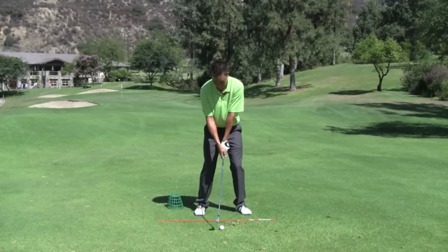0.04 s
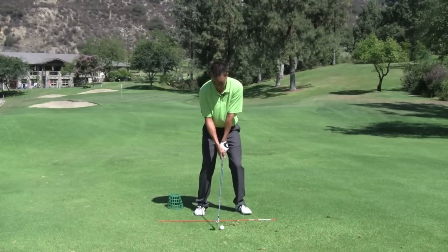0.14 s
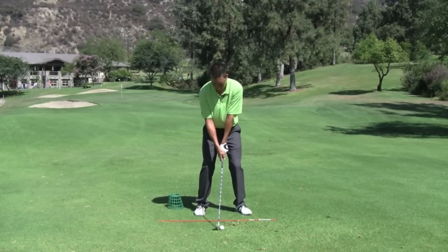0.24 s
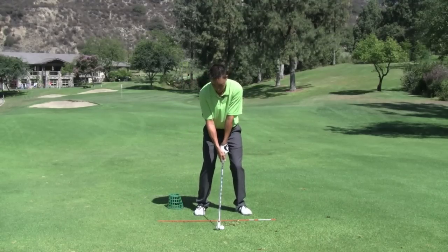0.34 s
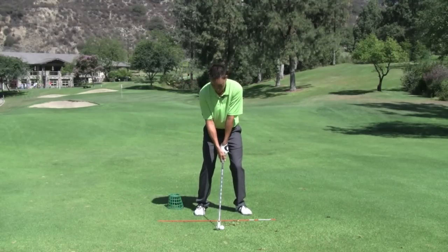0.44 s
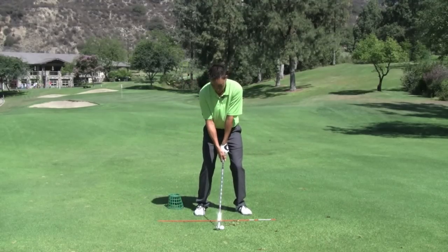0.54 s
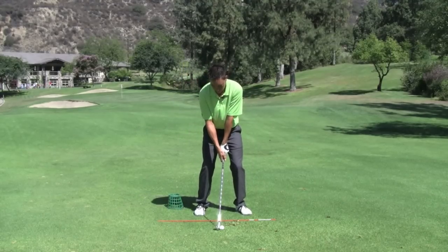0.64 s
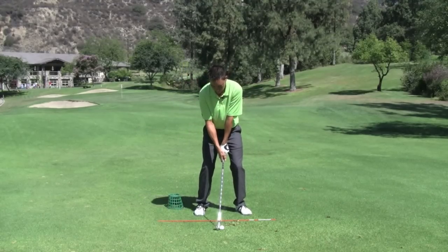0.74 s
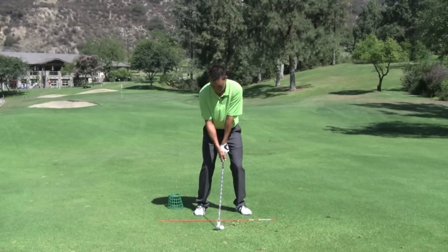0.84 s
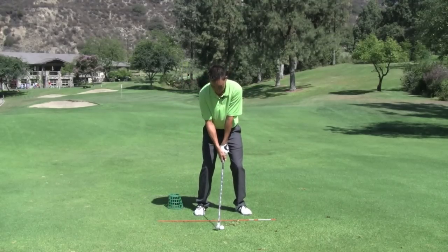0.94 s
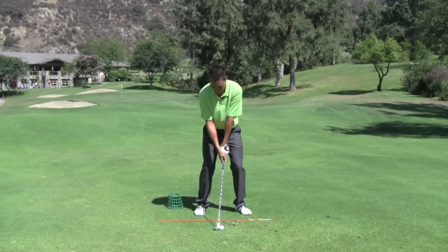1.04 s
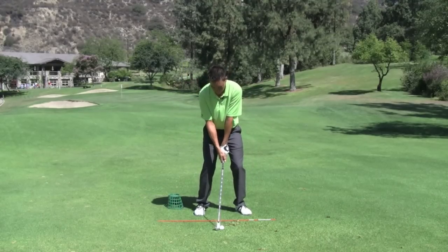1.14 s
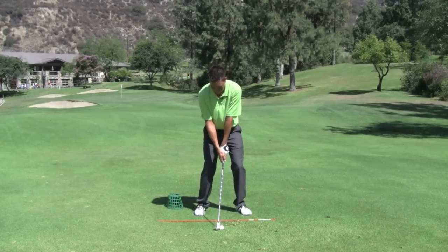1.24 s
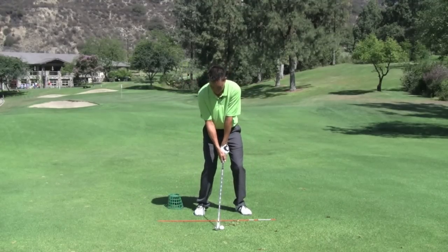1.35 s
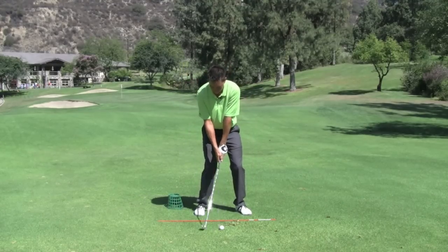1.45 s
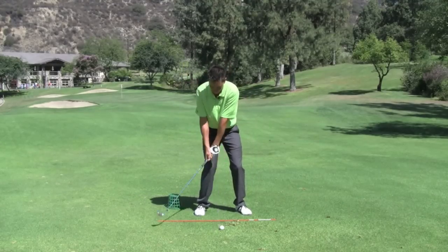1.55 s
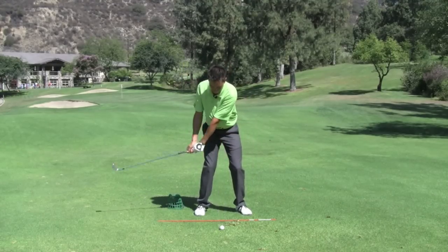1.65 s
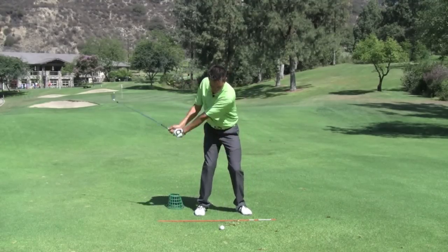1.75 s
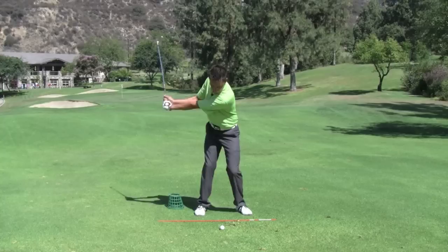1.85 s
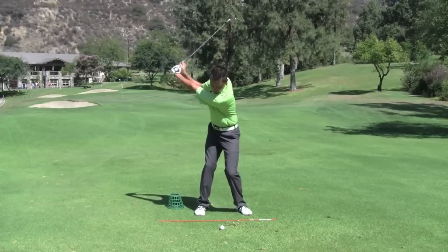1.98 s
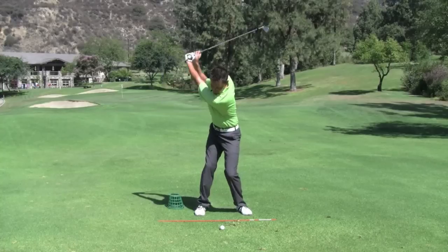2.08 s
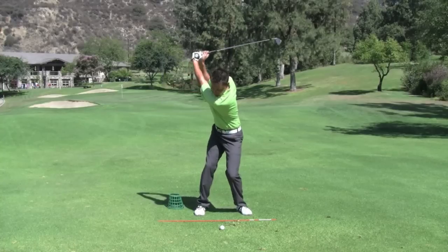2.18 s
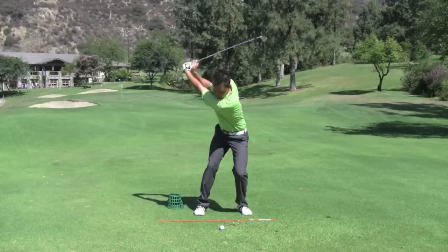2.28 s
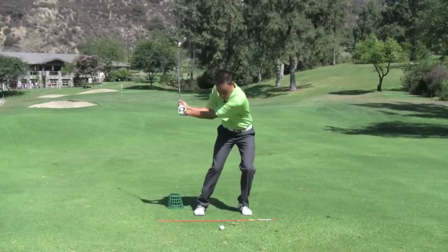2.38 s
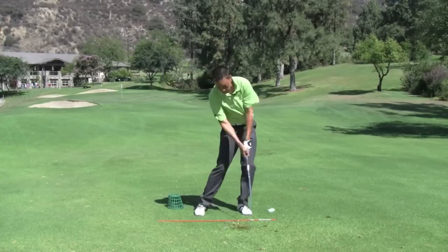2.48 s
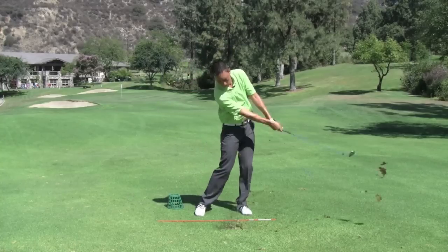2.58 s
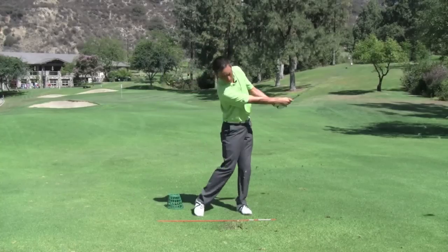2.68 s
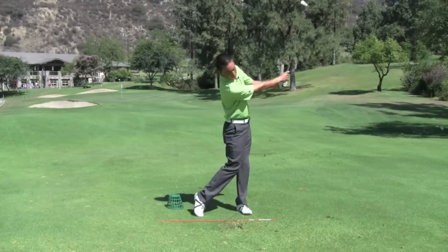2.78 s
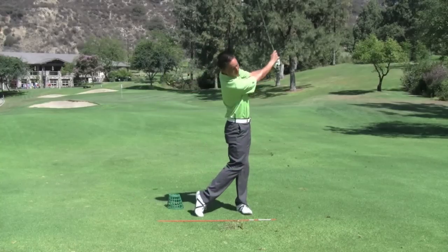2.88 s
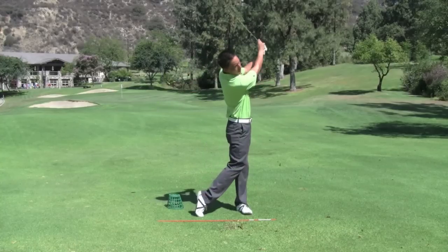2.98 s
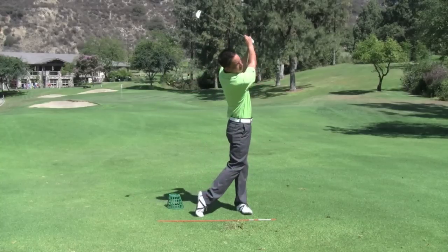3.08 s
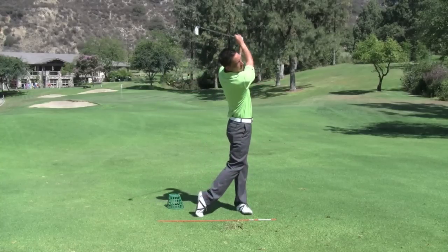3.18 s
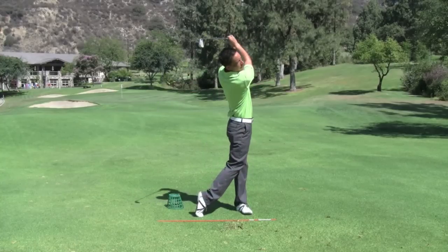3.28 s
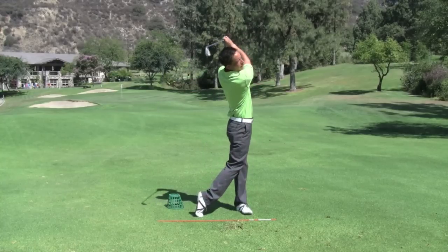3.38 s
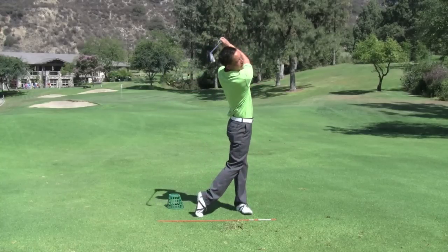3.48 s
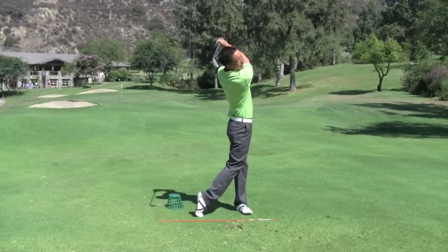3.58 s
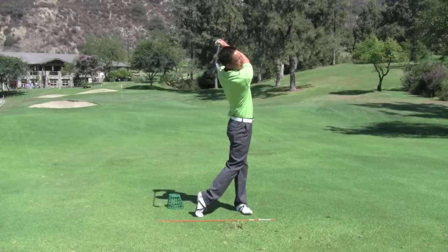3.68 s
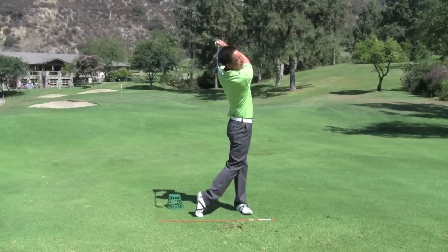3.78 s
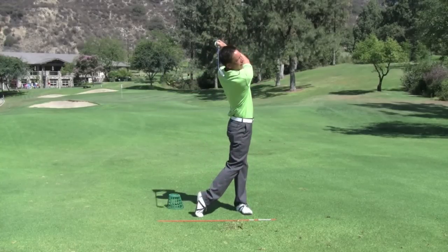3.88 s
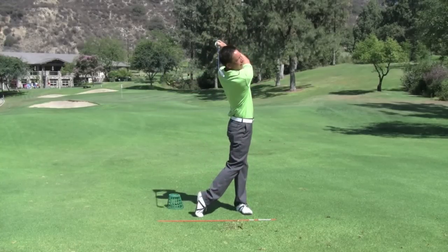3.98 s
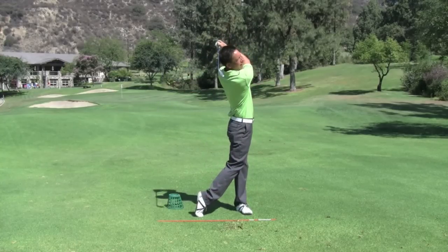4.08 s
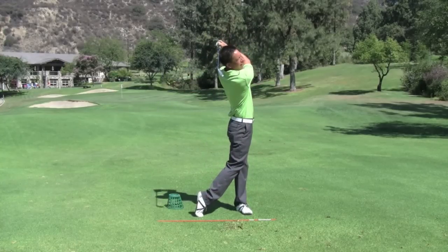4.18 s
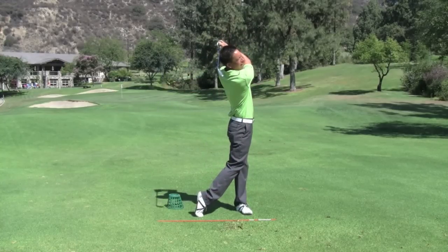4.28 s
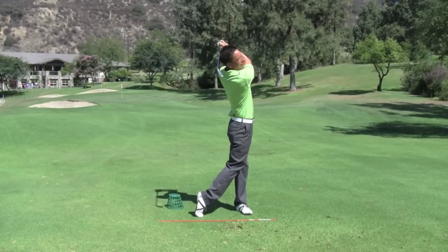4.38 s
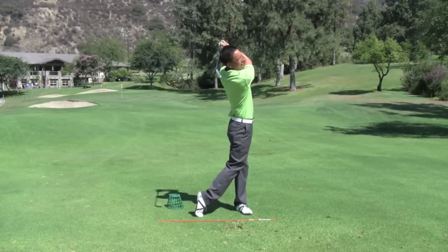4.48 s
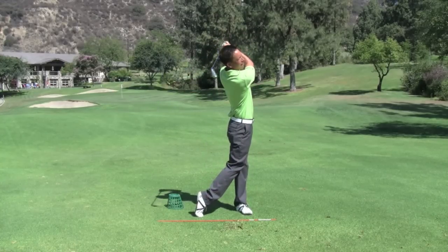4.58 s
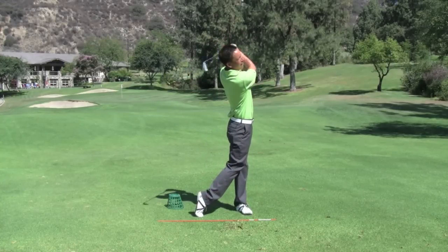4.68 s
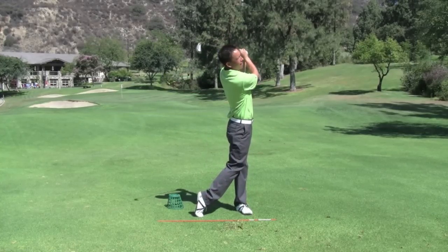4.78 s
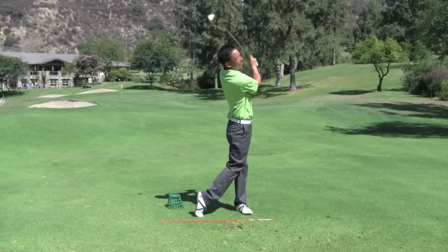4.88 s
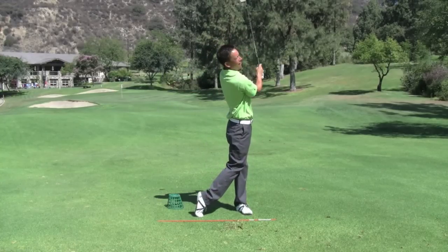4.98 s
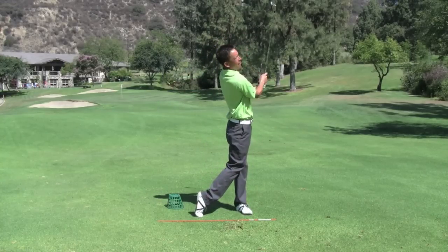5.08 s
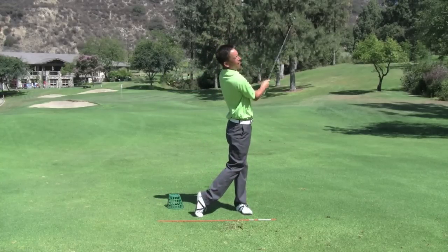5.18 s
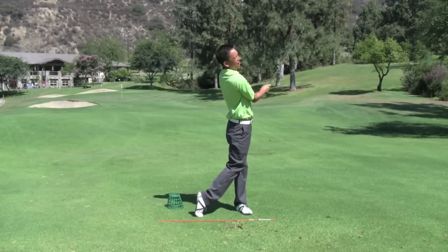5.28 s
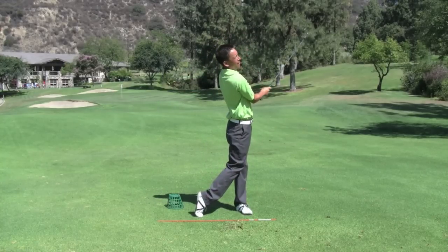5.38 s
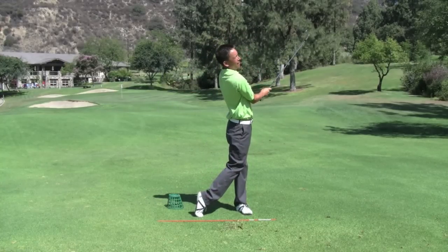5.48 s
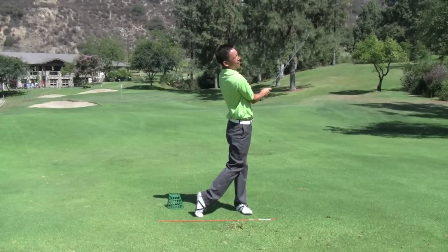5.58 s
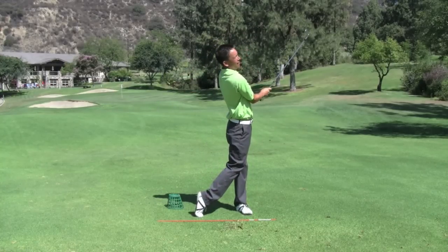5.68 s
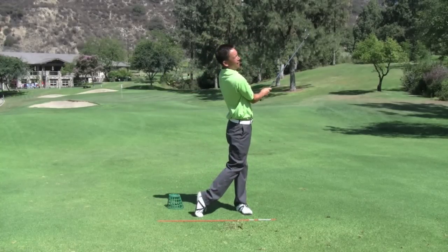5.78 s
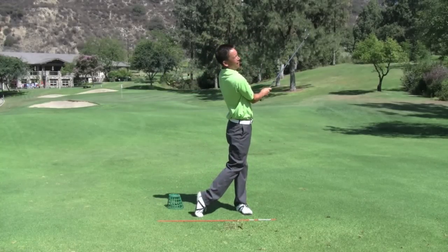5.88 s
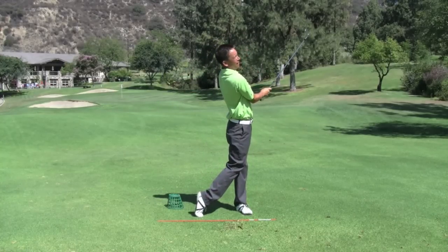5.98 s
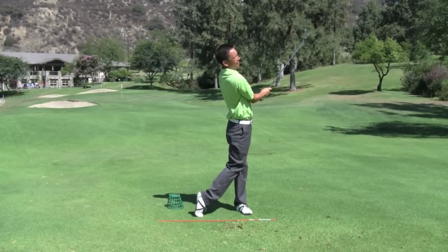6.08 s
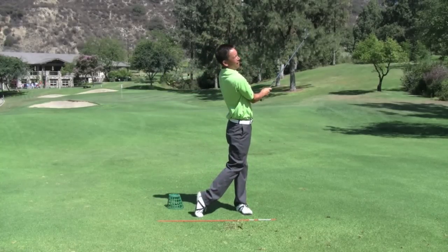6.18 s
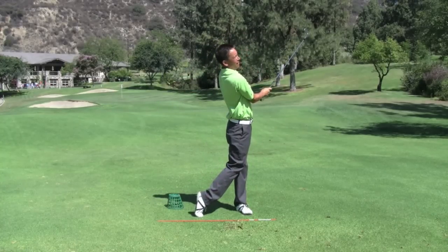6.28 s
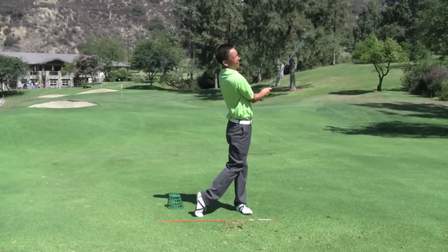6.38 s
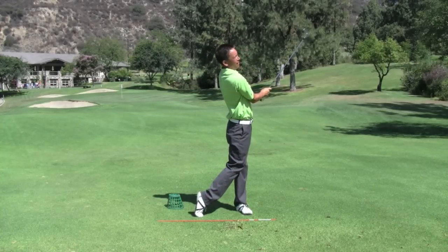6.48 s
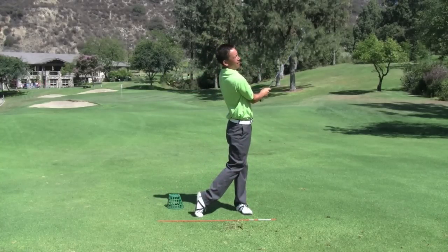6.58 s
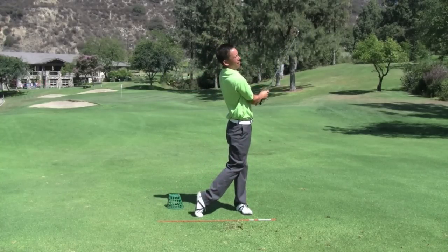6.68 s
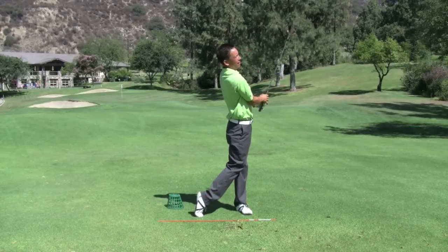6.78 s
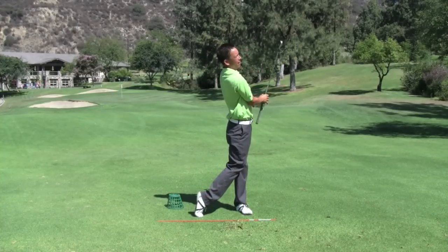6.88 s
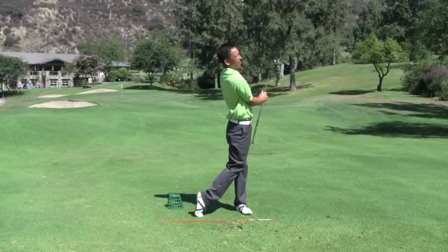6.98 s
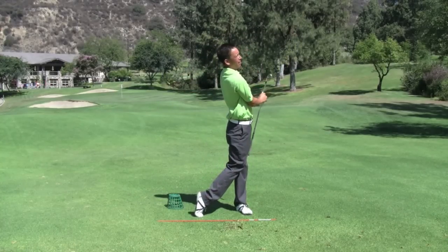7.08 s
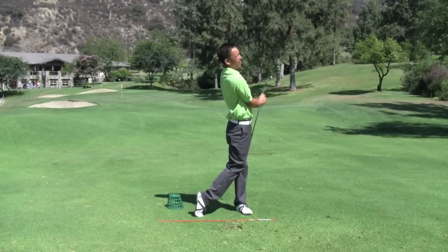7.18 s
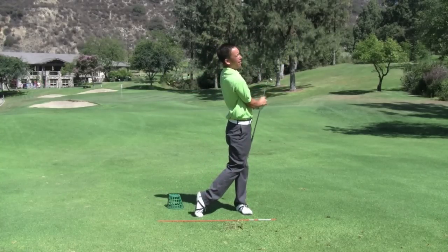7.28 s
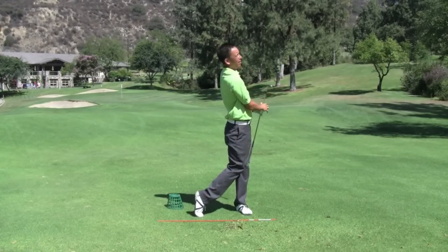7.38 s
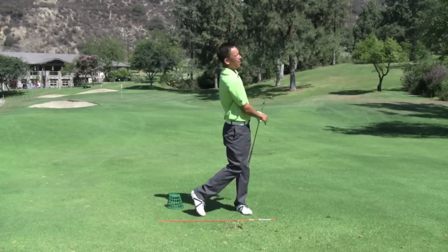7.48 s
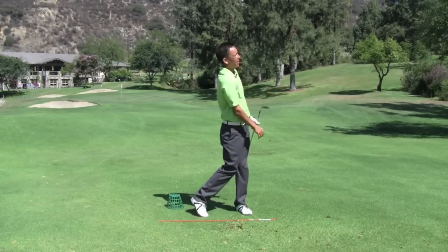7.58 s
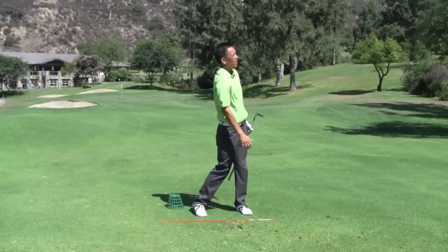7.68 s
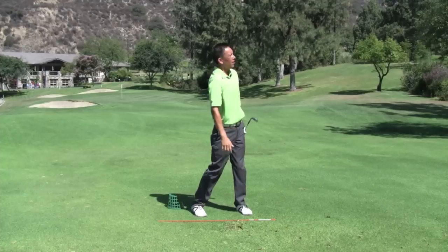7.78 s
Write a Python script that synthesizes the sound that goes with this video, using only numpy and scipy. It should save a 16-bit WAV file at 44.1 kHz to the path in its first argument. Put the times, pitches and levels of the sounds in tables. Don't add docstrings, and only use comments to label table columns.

```python
import sys
import numpy as np
from scipy import signal
from scipy.io import wavfile

SR = 44100
rng = np.random.default_rng(int(sys.argv[2]) if len(sys.argv) > 2 else 0)


def decibels_to_gain(level_db):
    exponent = np.asarray(level_db, float) / 20
    return 10 ** exponent


def materialize(psi):
    bounded = np.clip(np.atleast_2d(psi).T, -1, 1)
    quanta = np.round(bounded * 32767).astype(np.int16)
    wavfile.write(sys.argv[1], SR, quanta)


N = 346185
TIME = np.arange(N) / SR
SIDES = np.array([[1], [-1]])
BALL_S = 2.60232


def rms_one(x):
    return x / np.sqrt(np.mean(x ** 2) + 1e-20)


def in_time(rows):
    s, *columns = np.transpose(rows)
    return [np.interp(TIME, s, column) for column in columns]


def at_hz(points, hz):
    f_hz, value = np.array(points)[:, 0], np.array(points)[:, 1]
    return np.interp(np.log(hz), np.log(f_hz), value)


def band(x, low_hz, high_hz):
    edges_hz = [low_hz, min(high_hz, 0.45 * SR)]
    return signal.sosfilt(signal.butter(2, edges_hz, "band", fs=SR, output="sos"), x)


def two_ports(mid, side, alike):
    alike = np.clip(alike, -1, 1)
    return np.sqrt(1 + alike) * mid + np.sqrt(1 - alike) * side * SIDES


def hiss(low_hz, high_hz, alike, count=N):
    mid, side = band(rng.standard_normal((2, count)), low_hz, high_hz)
    return rms_one(two_ports(mid, side, alike))


def drift(rate_hz):
    r = np.exp(-80 * np.pi * rate_hz / SR)
    slow = signal.lfilter([1], [1, -2 * r, r * r], rng.standard_normal(N // 40 + 2002))[2000:]
    return np.interp(np.arange(N) / 40, np.arange(len(slow)), rms_one(slow))


def add(out, s, x, pan_db=0):
    at = round(s * SR)
    panned = x * decibels_to_gain(SIDES * pan_db / 2)
    out[:, at:at + x.shape[-1]] += panned[:, :N - at]


def rung(modes):
    t = TIME[:SR // 4]
    return sum(decibels_to_gain(db - 60 * t / t60) * np.sin(2 * np.pi * hz * t) for hz, db, t60 in modes)


def dying(low_hz, high_hz, t60, alike):
    settled = hiss(low_hz, high_hz, alike, count=SR)[:, SR // 2:]
    return settled * decibels_to_gain(-60 * TIME[:SR // 2] / t60)


def swell(peak_s, rise_db_per_s, fall_db_per_s):
    before, after = np.maximum(peak_s - TIME, 0), np.maximum(TIME - peak_s, 0)
    return decibels_to_gain(-rise_db_per_s * before - fall_db_per_s * after)


def bell(middle_s, half_s):
    return np.exp(-((TIME - middle_s) / half_s) ** 2)


def air():
    # t/s, level/dB
    air_level = [(0.0, -50.5), (1.94, -51.5), (2.8, -49.5), (3.61, -51), (5.55, -51), (6.34, -53.5),
                 (6.84, -52), (7.85, -52.5)]
    # f/Hz, density/dB per Hz
    air_colour = [(24, -59.5), (40, -27), (85, -7), (109, 1.5), (140, -5.5), (185, 1.5), (204, -5.5),
                  (542, -5), (646, -7), (697, -7.5), (1020, -13), (1810, -18.5), (2840, -24.5), (4460, -29),
                  (16000, -38.5)]
    # f/Hz, correlation/1
    likeness = [(60, 0.93), (130, 1), (290, 0.22), (640, 0.34), (1410, 0.31), (3100, 0.32), (6820, 0.07),
                (15000, 0.091)]
    out, together = 0, drift(1.5)
    edges = 35 * 2 ** np.arange(0, 9.1, 1 / 3)
    white = rng.standard_normal((2, 2, N))
    for k, (low, high) in enumerate(zip(edges, edges[1:])):
        mid, side = band(white[k % 2], low, high)
        hz = np.sqrt(low * high)
        gain = decibels_to_gain(at_hz(air_colour, min(hz, 14000)) + 0.6 * (together + drift(9)))
        out = out + gain * two_ports(mid, side, at_hz(likeness, hz))
    out = out / np.std(band(out, 400, 2000))
    top = signal.ellip(10, 0.5, 50, 15750, fs=SR, output="sos")
    return signal.sosfilt(top, out * decibels_to_gain(in_time(air_level)[0] + 2))


def machine():
    # f/Hz, width/Hz, rms level/dB
    resonances = [(519.5, 30, -64.5), (718.4, 60, -61), (793.7, 23, -64)]
    # t/s, length/s, level/dB
    whine_pulses = [(1.46, .07, -57), (2.416, .08, -65), (3.5, 0.11, -59), (3.654, .07, -71),
                    (3.86, 0.088, -62), (4.755, 0.24, -66), (5.3, 0.087, -68), (6.02, .12, -63),
                    (6.91, .09, -63), (7.098, 0.086, -54.5), (7.219, .11, -66), (7.653, 0.22, -62)]
    whine_hz, ramp_s = 1773, 0.023
    out = 0
    for hz, width, db in resonances:
        out = out + decibels_to_gain(db + 2.5 * drift(3)) * hiss(hz - width / 2, hz + width / 2, 0.5)
    whine = decibels_to_gain(-70.5 + 4 * drift(3.5))
    for s, length, db in whine_pulses:
        whine += decibels_to_gain(db - 3) * np.clip(np.minimum(TIME - s, s + length - TIME) / ramp_s, 0, 1)
    return out + whine * np.sin(2 * np.pi * np.cumsum(whine_hz + 4 * drift(5)) / SR)


def breeze():
    # t/s, level/dB
    rumble_level = [(0.0, -31.5), (0.11, -41.5), (1.16, -44), (1.51, -48), (2.08, -42), (2.4, -45),
                    (2.69, -32.5), (2.82, -44.5), (3.32, -49.5), (4.9, -49), (5.31, -53), (5.64, -61.5),
                    (6.8, -70), (7.52, -60), (7.7, -48.5), (7.85, -61)]
    # t/s, peak level/dB, f/Hz, length/s
    buffets = [(0.009, -27, 161, 0.029), (0.079, -37, 134, 0.041), (0.249, -25.5, 124, 0.049),
               (0.287, -23, 128, 0.052), (0.319, -24.5, 143, 0.05), (0.359, -24.5, 178, 0.026),
               (0.439, -25.5, 135, 0.037), (0.55, -38, 181, 0.035), (0.638, -32, 173, 0.039),
               (1.226, -31.5, 80.7, 0.033), (1.722, -31, 148, 0.028), (1.853, -32.5, 137, 0.046),
               (1.915, -31.5, 144, 0.031), (2.126, -32.5, 127, 0.069), (2.195, -25, 139, 0.044),
               (2.503, -29, 151, 0.027), (2.549, -21.5, 177, 0.052), (2.579, -22, 150.6, 0.047),
               (2.645, -25, 218, 0.042), (2.743, -23, 109, 0.037), (2.789, -29, 141, 0.049),
               (3.007, -29.5, 120, 0.033), (3.068, -33, 108, 0.042), (4.048, -33.5, 145, 0.034),
               (4.202, -41, 153, 0.034), (5.509, -38.5, 287, 0.04)]
    apart_db, apart_spread_db = 1.5, 3.5
    low = hiss(70, 170, 0.6) * decibels_to_gain(3 * drift(14))
    upper = hiss(140, 300, -0.6) * decibels_to_gain(-3 + 4 * drift(14))
    out = decibels_to_gain(in_time(rumble_level)[0] - 3) * (low + upper)
    gusty = hiss(140, 332, 0.084)
    for (s, db, hz, length), turn in zip(buffets, rng.random((len(buffets), 3))):
        t = TIME[:int(2.5 * length * SR)]
        pulse = t / (0.26 * length) * np.exp(1 - t / (0.28 * length))
        shape = decibels_to_gain(db - 4.5) * pulse ** 1.78
        mid = decibels_to_gain(-1) * np.sin(2 * np.pi * (hz * t + turn[0]))
        apart = decibels_to_gain(apart_db + apart_spread_db * (2 * turn[2] - 1))
        side = apart * np.sin(2 * np.pi * (max(1.3 * hz, 175) * t + turn[1]))
        rough = decibels_to_gain(-6.5) * gusty[:, round(s * SR):][:, :len(t)]
        add(out, s, shape * (mid + side * SIDES + rough))
    return out


def birds():
    # top t/s, top f/Hz, level/dB, rise/s, fall/s
    arches = [
        (0.829, 4830, -60, .012, .036),
        (3.22, 4340, -57.5, .021, 0.06),
        (4.961, 4360, -53.5, 0.041, 0.027),
    ]
    # top t/s, top f/Hz, level/dB, rise/s, fall/s
    steep_arches = [
        (1.456, 4100, -65, .032, .034),
        (6.708, 4236, -58, .017, .03),
        (7.262, 4120, -57.5, .019, .036),
    ]
    # start t/s, length/s, from f/Hz, to f/Hz,
    # level/dB
    peeps = [(0.41, .025, 4530, 5600, -69), (0.86, 0.11, 3900, 3900, -61.5), (0.96, .1, 3890, 3600, -72),
             (3.25, .026, 6400, 5700, -60), (4.983, 0.026, 3620, 3460, -59), (4.98, .1, 4230, 4300, -73),
             (5.724, .03, 5870, 6000, -62), (6.615, 0.043, 1190, 927, -55.5),
             (6.73, 0.028, 6420, 6380, -63), (6.735, .022, 3180, 3180, -60),
             (6.745, 0.065, 3890, 3900, -70), (6.83, .025, 683, 672, -49), (7.215, 0.035, 3300, 3100, -61)]
    crest_s, fade_db_per_s = 0.007, 70
    notes = []
    for rows, sweep_hz_per_s in [(arches, 38000), (steep_arches, 50000)]:
        for s, hz, db, rise, fall in rows:
            t = TIME[:int((rise + fall) * SR)] - rise
            pitch = hz - sweep_hz_per_s * (np.hypot(t, crest_s) - crest_s)
            level_db = db - fade_db_per_s * np.where(t < 0, -3 * t, t)
            notes.append((s - rise, pitch, level_db))
    for s, length, from_hz, to_hz, db in peeps:
        notes.append((s, np.linspace(from_hz, to_hz, int(length * SR)), db))
    out = np.zeros((2, N))
    for s, pitch, db in notes:
        t = TIME[:len(pitch)]
        ends = np.clip(np.minimum(t, t[-1] - t) / 0.0058, 0, 1)
        add(out, s, ends * decibels_to_gain(db + 4) * np.sin(2 * np.pi * np.cumsum(pitch) / SR))
    out = out * decibels_to_gain(2.5 * drift(45))
    echo = np.stack([np.roll(out[0], 900), np.roll(out[0], 1500)])
    return out * decibels_to_gain(0.5 * SIDES) + decibels_to_gain(-7) * echo


def knocks():
    # t/s, peak level/dB, f/Hz
    blows = [
        (0.568, -32, 571),
        (1.078, -30.5, 716),
        (1.62, -29, 637),
        (2.184, -34, 636),
    ]
    out = np.zeros((2, N))
    onset = np.minimum(TIME[:SR // 4] / 0.0048, 1)
    for s, db, hz in blows:
        modes = [(hz, db - 1, 0.06), (1.25 * hz, db - 11, 0.05), (0.63 * hz, db - 2, 0.05)]
        add(out, s, rung(modes) * onset, 1.5)
    return out


def rustle():
    # middle t/s, half length/s, low f/Hz, high f/Hz, level/dB
    slides = [
        (2.405, .08, 6500, 8500, -68),
        (5.27, 0.077, 2000, 7000, -62.5),
        (5.65, 0.065, 4500, 7000, -68),
        (6.06, .04, 3000, 5500, -65),
        (6.72, .1, 2800, 6000, -62.5),
    ]
    out = sum(decibels_to_gain(db) * bell(s, half) * hiss(low, high, 0.5) for s, half, low, high, db in slides)
    return out * decibels_to_gain(2.5 * drift(30))


def swish():
    passing = swell(BALL_S, 0, 1500)
    speed = np.clip((TIME - 2.55) / 0.045, 0, 1)
    slow, fast = hiss(250, 600, 0.98), hiss(480, 700, 0.98)
    wake = ((1 - speed) * slow + speed * fast) * decibels_to_gain(3.1 * drift(60))
    wake = decibels_to_gain(-29) * swell(2.554, 650, 0) * wake
    rush = hiss(700, 3500, 0.9) + decibels_to_gain(-9) * band(hiss(3500, 7500, 0.8), 3000, 7800)
    into_grass = swell(2.593, 0, 1500)
    rush = decibels_to_gain(-38) * swell(2.58, 380.5, 300) * into_grass * rush
    return passing * (wake + rush)


def impact():
    # f/Hz, level/dB, t60/s
    snap = [(3300, 1.5, .003), (-11000, 0.5, .0018), (-14000, -5, .002)]
    # f/Hz, level/dB, t60/s
    face = [(3140, -11.5, 0.022), (2800, -16, 0.018), (4790, -10.5, .011), (5590, -15, .012),
            (6400, -11.5, 0.0097), (7500, -12, .006), (11200, -21, .008), (12700, -26, .008)]
    # f/Hz, level/dB, t60/s
    head = [(1145, 0.5, 0.017), (1693, -7, 0.018), (820, -8.5, 0.027), (2000, -15, .018), (476, -15, 0.042)]
    ring_s, turf_s = 2.6029, 2.60326
    out = np.zeros((2, N))
    add(out, BALL_S, rung(snap[1:2]), -1.5)
    add(out, BALL_S + 3 / SR, rung(snap[:1]))
    add(out, BALL_S, rung(snap[2:]), 9)
    add(out, ring_s, rung(face), -0.4)
    loading = 1 - np.exp(-(TIME[:SR // 4] / 0.0013) ** 2)
    add(out, turf_s, -rung(head) * loading)
    add(out, BALL_S, decibels_to_gain(-20) * dying(1500, 6000, 0.02, 0.3))
    add(out, BALL_S, decibels_to_gain(-21) * dying(6000, 15000, 0.02, 0.3), 3)
    add(out, BALL_S, decibels_to_gain(-31) * dying(400, 3000, 0.035, 0.6))
    return out


def tree_echoes():
    # start t/s, length/s, low band level/dB, high band level/dB
    returns = [
        (2.669, 0.024, -45, -48),
        (2.724, 0.1, -48.5, -59.5),
        (2.745, 0.029, -42, -64),
        (2.835, 0.056, -54, -68),
        (2.89, .08, -60, -72),
    ]
    out = np.zeros((2, N))
    patchy = decibels_to_gain(2.2 * drift(90))
    low = band(hiss(600, 3600, 0.53), 500, 3700)
    high = band(hiss(4000, 8000, 0.4), 3500, 8800)
    for s, length, low_db, high_db in returns:
        shape = swell(s, 1500, 0) * swell(s + length, 0, 600)
        out += patchy * shape * (decibels_to_gain(low_db + 0.5) * low + decibels_to_gain(high_db) * high)
    return out


def far_ticks():
    # t/s, peak level/dB, ring share/dB, thud share/dB
    contacts = [
        (3.3225, -16, -2.2, -15),
        (3.3315, -27.5, -3, -33),
        (3.391, -26, -9, 3.5),
        (3.394, -28.5, -16, 0),
    ]
    # f/Hz, level/dB, t60/s
    tick_modes = [(3350, -6, 0.016), (3030, -2.5, .015), (2600, -11, 0.014), (3830, -19, .014),
                  (1140, -14, 0.0085), (4830, -28, 0.018), (5600, -20, 0.018), (11850, -17.5, .01)]
    out, t = np.zeros((2, N)), TIME[:SR // 50]
    push = 0.8 * np.exp(-t / 0.00008)
    thud = push - 1.2 * np.sin(2 * np.pi * 480 * t) * np.exp(-t / 0.0011)
    for s, db, ring_db, thud_db in contacts:
        add(out, s, decibels_to_gain(db + ring_db) * rung(tick_modes), -2.5)
        add(out, s, decibels_to_gain(db + thud_db) * thud, -2.5)
    first_s, second_s = contacts[0][0], contacts[2][0]
    add(out, first_s, decibels_to_gain(-31) * dying(2500, 3660, 0.07, 0.7))
    add(out, first_s, decibels_to_gain(-39) * dying(2600, 3800, 0.3, 0.41))
    add(out, first_s, decibels_to_gain(-44) * dying(1000, 12000, 0.2, 0.5))
    add(out, second_s, decibels_to_gain(-45.5) * band(dying(1000, 7300, 0.59, 0.22), 600, 8200))
    add(out, second_s, decibels_to_gain(-52) * dying(2600, 3800, 0.99, 0.53))
    return out


def clicks():
    # t/s, peak level/dB, f/Hz
    small_blows = [(3.46, -43, 7800), (3.885, -51, 5200), (5.238, -47, 5670), (5.283, -45, 5000),
                   (5.293, -50, 6300), (5.326, -45, 2900), (5.385, -40, 6600), (5.392, -41, 2600),
                   (5.62, -48, 6600), (5.67, -53, 6000), (5.704, -39, 6300), (5.704, -44, 5000),
                   (6.855, -48, 12000)]
    out = np.zeros((2, N))
    for s, db, hz in small_blows:
        add(out, s, rung([(hz, db - 8, 0.018)]), 2.1)
        burst = band(dying(0.45 * hz, 1.6 * hz, 0.03, 0.8), 2000, max(10500, 1.3 * hz))
        add(out, s, decibels_to_gain(db - 9) * burst, 2.1)
    return out


def grip_squeak():
    # t/s, half length/s, f/Hz, width/Hz, level/dB
    squeaks = [
        (6.675, .035, 3180, 200, -65),
        (6.7, .04, 4900, 500, -62),
        (6.726, .03, 902, 30, -52),
        (6.73, .03, 1355, 50, -56),
        (6.05, .04, 3230, 120, -68),
        (6.057, 0.044, 873, 40.3, -53),
    ]
    out = decibels_to_gain(-53.5) * bell(6.72, 0.16) * hiss(800, 1300, 0.57)
    for s, half, hz, width, db in squeaks:
        out += decibels_to_gain(db) * bell(s, half) * hiss(hz - width / 2, hz + width / 2, 0.88)
    return out


def scene():
    valley = air() + machine() + breeze() + birds() + knocks()
    shot = swish() + impact() + tree_echoes() + far_ticks()
    return valley + shot + rustle() + clicks() + grip_squeak()


def band_limit(x):
    return signal.sosfilt(signal.butter(12, 17110, fs=SR, output="sos"), x)


def record(dry):
    wind_filter = signal.butter(2, 65, "high", fs=SR, output="sos")
    top = signal.ellip(8, 0.5, 60, 16900, fs=SR, output="sos")
    limited = np.clip(signal.sosfilt(wind_filter, dry), -0.93, 0.93)
    return band_limit(signal.sosfilt(top, limited))


dry = scene()
out = record(dry)
materialize(out)
```